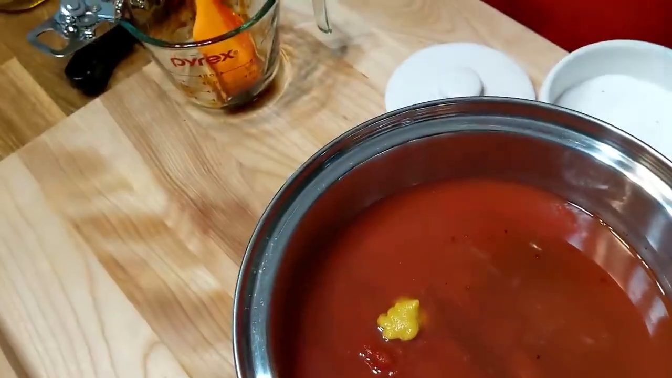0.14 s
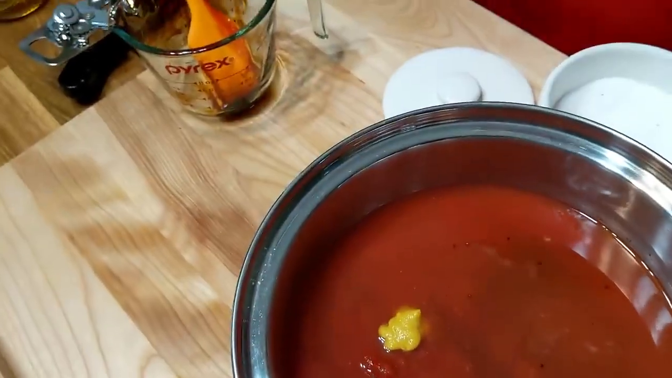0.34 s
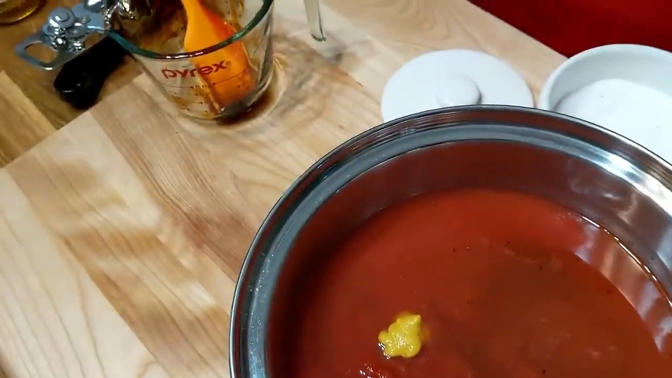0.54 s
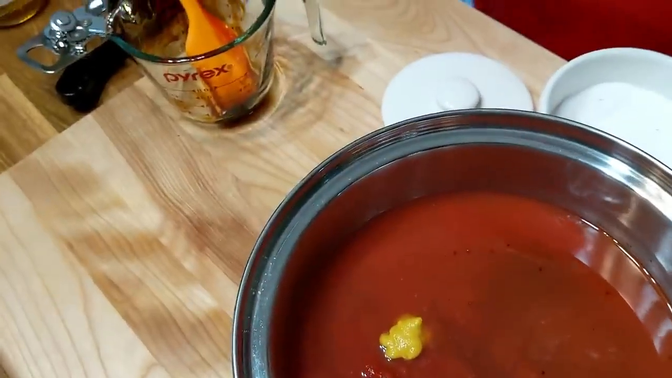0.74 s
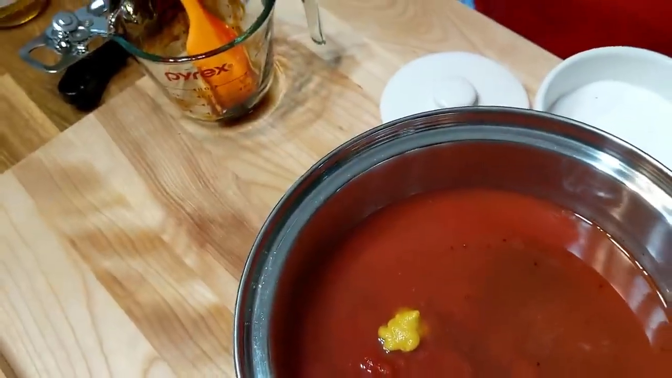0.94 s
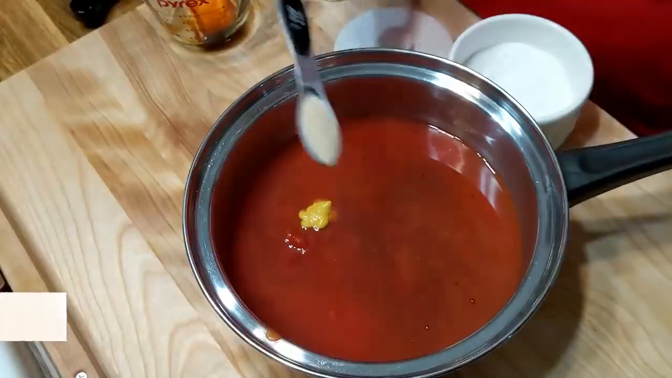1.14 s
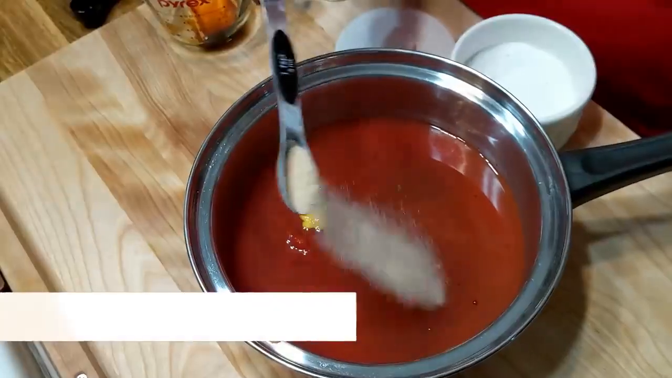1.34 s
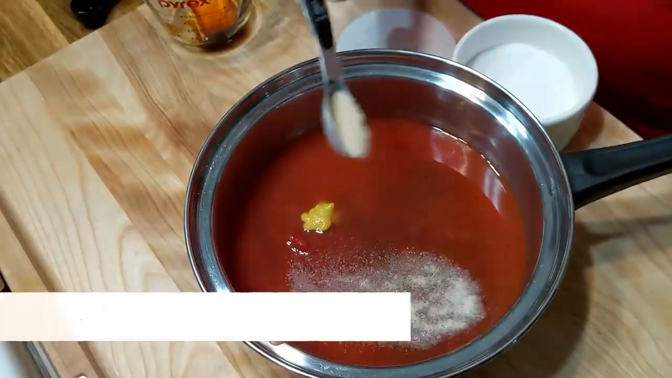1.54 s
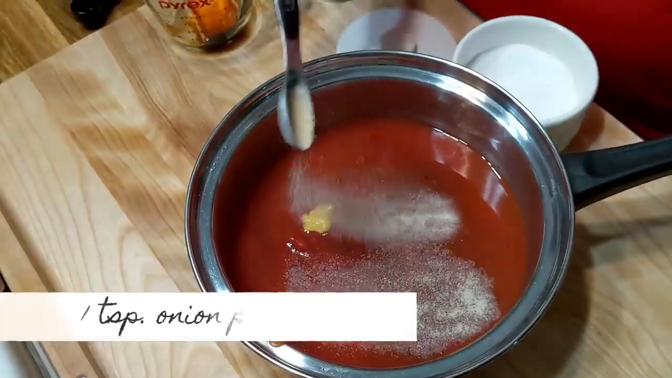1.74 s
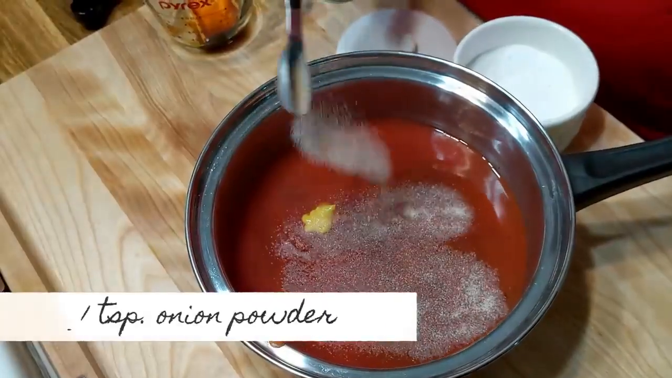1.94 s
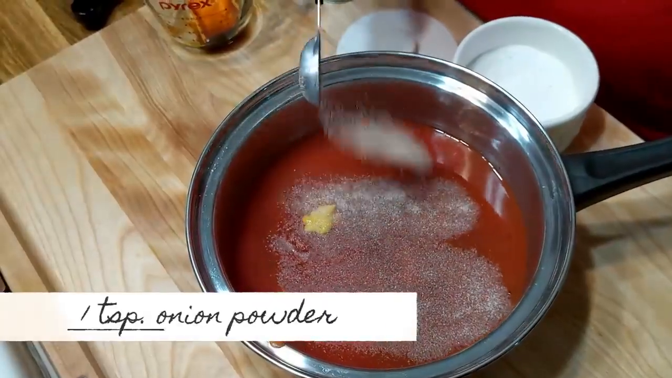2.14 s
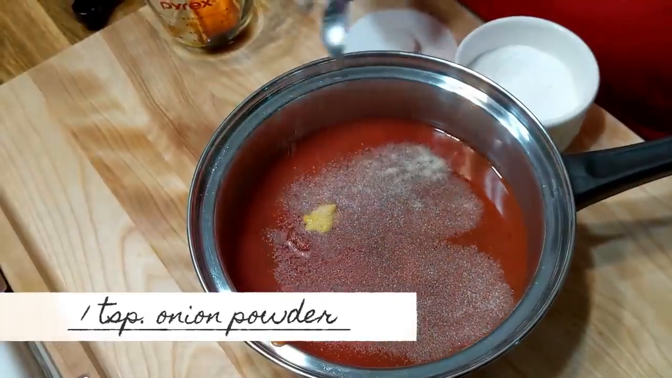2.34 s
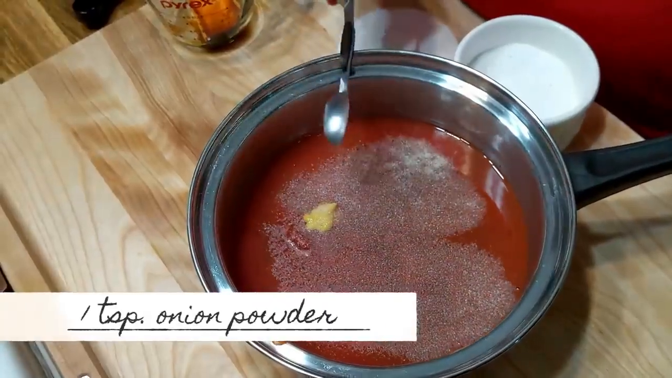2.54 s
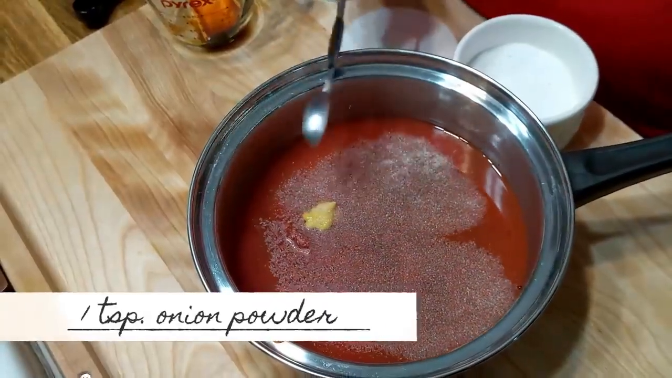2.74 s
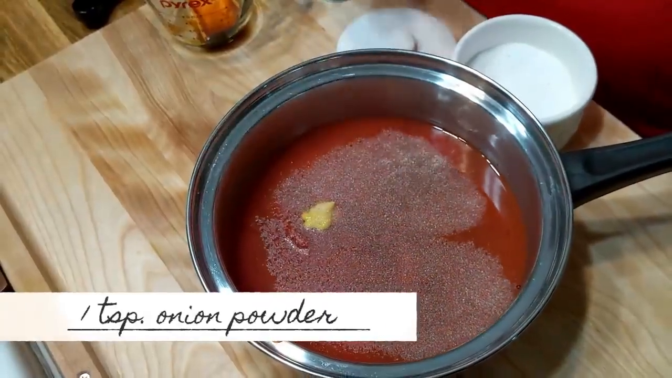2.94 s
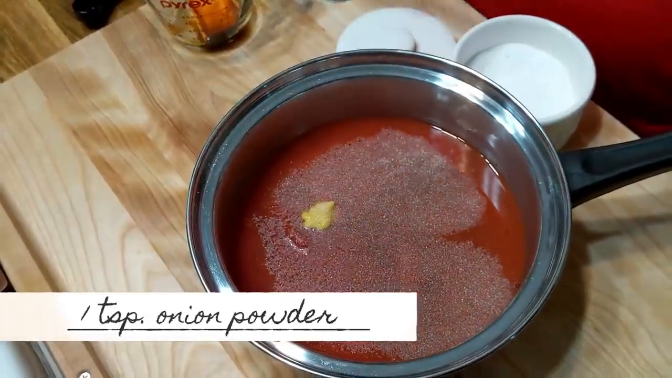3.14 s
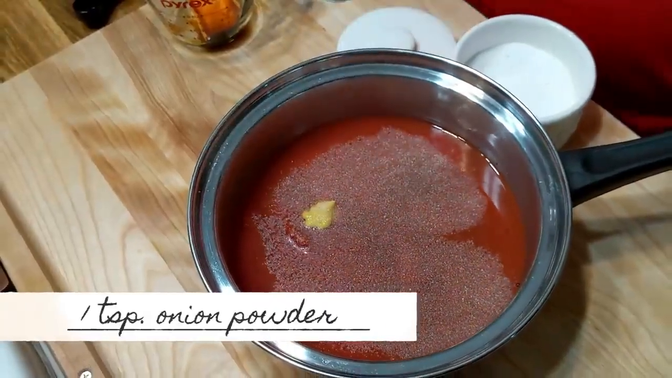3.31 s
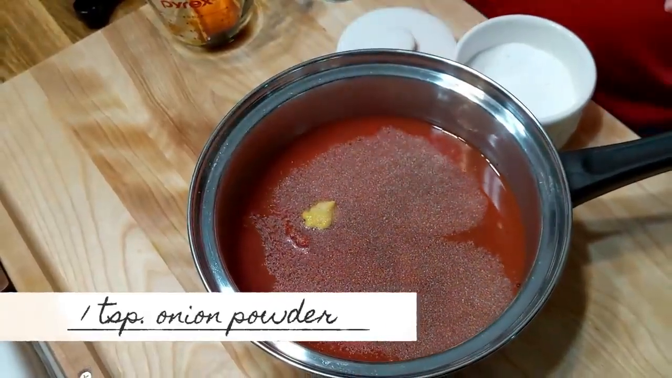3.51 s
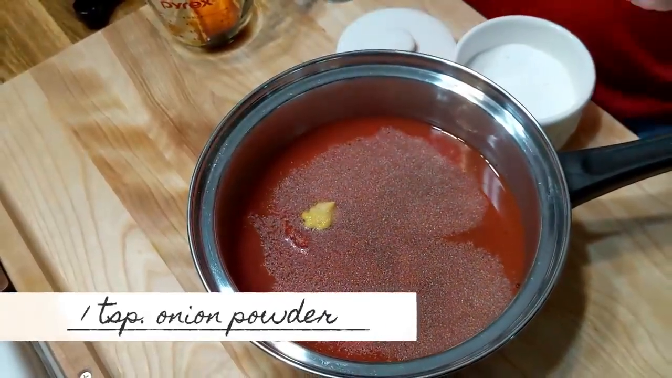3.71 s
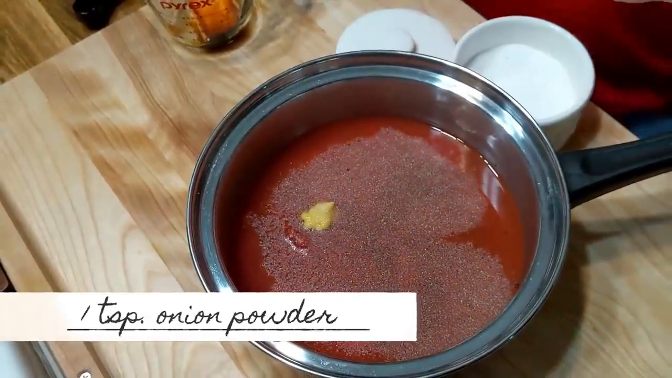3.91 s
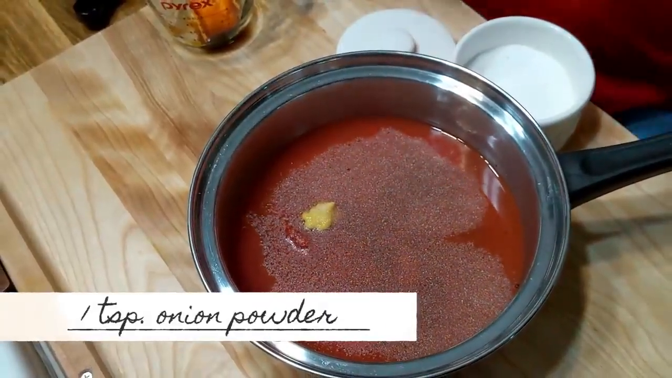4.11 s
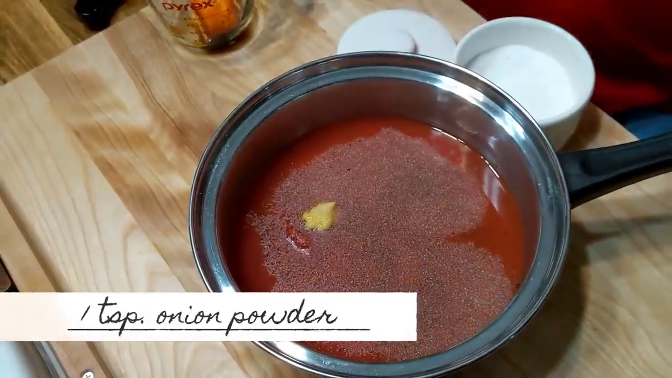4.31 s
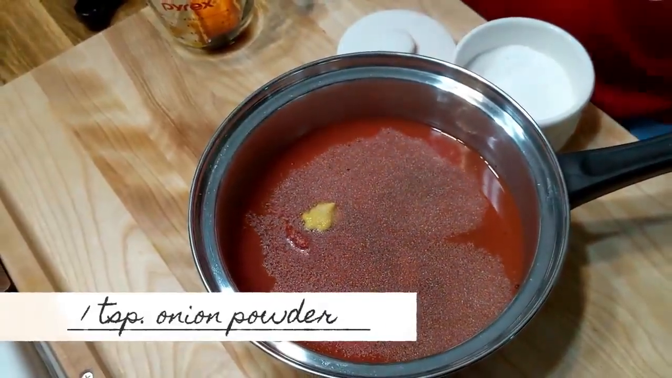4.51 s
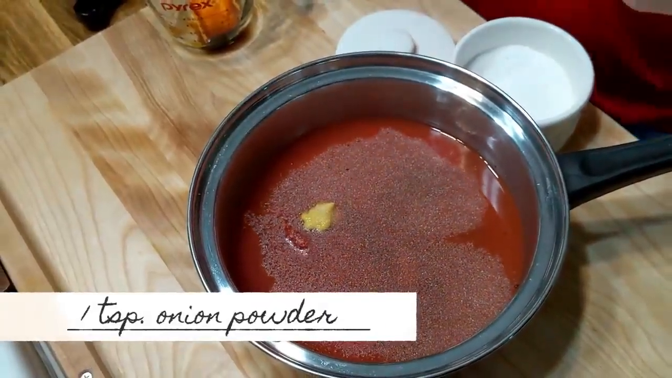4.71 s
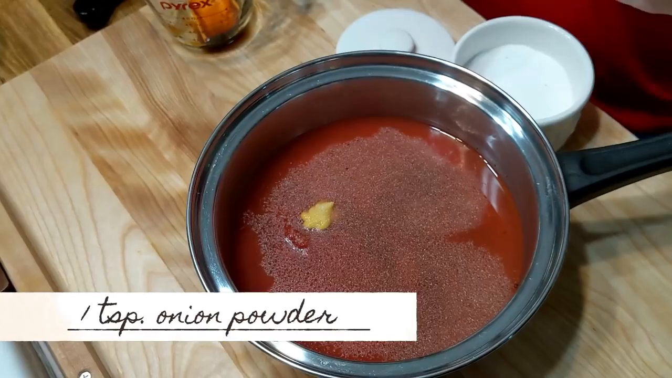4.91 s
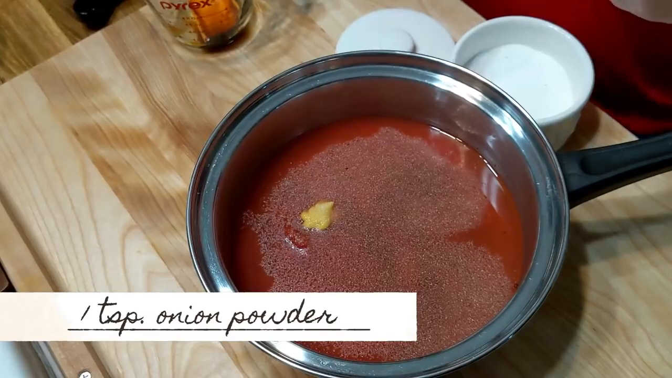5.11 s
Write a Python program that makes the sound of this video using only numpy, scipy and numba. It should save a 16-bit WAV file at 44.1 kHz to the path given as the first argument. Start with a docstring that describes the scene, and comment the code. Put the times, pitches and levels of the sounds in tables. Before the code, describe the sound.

A small kitchen heard through a close stereo camera microphone, with steady airy noise, a low wavering fridge hum and faint cloth and hand rustle, stronger on the right. A tiny tick falls near 0.4 s, then a soft thud and clearer knock on wood with a scuff around 0.65-0.7 s. Quiet rustling continues. At about 2.67 s and again at 2.88 s, a metal spoon strikes a steel saucepan rim: very loud, sharp, bright clanks with dense inharmonic ringing and clatter, overloading the microphone with a low bump, fading over roughly half a second in a short room echo. Near 4.0 s come two light knocks, mostly right. From 4.37 to 4.7 s a quick cluster of hard clicks and knocks, some loud, some with a glassy ring or woody thud, mixes with rustling. From 4.9 to 5.25 s something slides gritty across the board.

```python
"""A fridge hums under kitchen air, faint rustling runs throughout, and small things knock on a wooden board.
A metal measuring spoon then strikes a steel saucepan's rim twice, close under a stereo camera microphone.
More knocks follow, some with glass ringing, and something slides over the board.
Noise shaped in frequency makes air, friction and clatter; decaying sines make the ringing.
The blows overload the camera: its gain ducks and its baseline lurches."""
import sys
import numpy as np
from scipy import signal
from scipy.fft import rfft, irfft, next_fast_len
from scipy.io import wavfile
from scipy.ndimage import uniform_filter1d
from numba import njit

SR = 44100
rng = np.random.default_rng(int(sys.argv[2]) if len(sys.argv) > 2 else 0)


def master_out(mix):
    """Clip the mix to full scale and print it as 16-bit PCM to the path in sys.argv[1]."""
    frames = np.transpose(np.atleast_2d(mix))
    ceiling = np.clip(frames, -1, 1)
    pcm = np.round(ceiling * 32767).astype(np.int16)
    wavfile.write(sys.argv[1], SR, pcm)


N = 232089  # length in samples


def undb(db):
    """Gain of a dB value."""
    return 10 ** (np.asarray(db, float) / 20)


def on_log(table, hz):
    """Read a (Hz, value) table on a log-frequency axis."""
    table_hz, values = np.transpose(table)
    return np.interp(np.log(np.maximum(hz, 1)), np.log(table_hz), values)


def coloured(colour, size, channels=2):
    """Noise of rms 1 with the given spectrum."""
    n = next_fast_len(size)
    shape = undb(on_log(colour, np.fft.rfftfreq(n, 1 / SR)))
    white = rng.standard_normal((channels, n))
    noise = irfft(rfft(white) * shape, n)[:, :size]
    return noise / np.sqrt(np.mean(noise ** 2))


def fading(x, t60s):
    """Let each half-octave band of x die away at its own rate."""
    size = x.shape[1]
    t = np.arange(size) / SR
    spectrum = rfft(x)
    half_octave = np.log2(np.maximum(np.fft.rfftfreq(size, 1 / SR), 1)) * 2
    out = 0
    for k in range(10, 29):  # overlapping triangular bands
        band = irfft(spectrum * np.clip(1 - abs(half_octave - k), 0, 1), size)
        t60 = max(on_log(t60s, 2 ** (k / 2)), .01)
        out = out + band * undb(-60 * t / t60)
    return out


def ring(modes, size, scatter_db, turn):
    """Decaying modes; each microphone port hears each with its own strength and phase."""
    hz, db, t60 = np.transpose(modes)[:, :, None, None]
    strength, phase = rng.standard_normal((2, len(modes), 2, 1))
    t = np.arange(size) / SR
    # the ports differ less in phase below 2 kHz
    waves = np.sin(2 * np.pi * hz * t + turn * phase * np.minimum(hz / 2000, 1))
    level = undb(db + scatter_db * strength - 60 * t / np.maximum(t60, .002))
    return (level * waves).sum(axis=0)


def paired(modes, split):
    """A not quite round vessel splits each mode into two that beat."""
    pairs = []
    for hz, db, t60 in modes:
        for side in (0, rng.uniform(-0.89, 1)):
            pairs.append((hz * (1 + side * split), db - 5.5, t60))
    return pairs


def add(out, s, x, pan_db):
    """Mix x into out at time s, with the left louder than the right by pan_db."""
    i = int(s * SR)
    panned = x * undb([[pan_db / 2], [-pan_db / 2]])
    out[:, i:i + x.shape[1]] += panned[:, :N - i]


def walk(rate):
    """Random levels held 1 / rate s and slewed twice; spread near 1."""
    hold = int(SR / rate)
    steps = np.repeat(rng.standard_normal(N // hold + 1), hold)
    return 1.23 * uniform_filter1d(uniform_filter1d(steps, hold), hold)[:N]


def swells(table):
    """Sum of swells, each a rounded rise to its middle and an exponential fall."""
    s, db, rise, fall = np.transpose(table)[:, :, None]
    t = np.arange(N) / SR - s
    shape = np.exp(-np.where(t < 0, (t / rise) ** 2, t / fall))
    return (undb(db) * shape).sum(axis=0)


# Kitchen air common to both ports. Each row: frequency in Hz, relative density in dB per Hz.
AIR_MID = [(12, -7.5), (20, 6), (65, -9.5), (81, -13.5), (113, -0.5), (146, -11), (182, -11), (234, -11.5),
           (357, -15), (624, -19.5), (825, -20.5), (1860, -35), (3250, -31), (10800, -39.5), (16000, -32)]
# Kitchen air opposite in the two ports. Each row: frequency in Hz, relative density in dB per Hz.
AIR_SIDE = [(12, -37), (20, 1), (49, -9), (163, -10), (270, -2.5), (660, -3.5), (1030, -11), (1150, -14),
            (1330, -13), (1960, -18.5), (3250, -14), (10800, -20.5), (16000, -15)]
AIR_MID_DB, AIR_SIDE_DB = -43.5, -52
# Fridge tones. Each row: frequency in Hz, rms level in dB about which it wavers.
FRIDGE_HUM = [(60, -52.5), (108, -55), (119, -57), (178, -58.5), (355, -62.5), (673, -64.5), (1351, -70)]


def kitchen():
    """Nearly steady air noise, part common and part opposite at the ports, under wavering fridge tones."""
    mid = undb(AIR_MID_DB + 0.077 * walk(3.06)) * coloured(AIR_MID, N, channels=1)
    side = undb(AIR_SIDE_DB) * coloured(AIR_SIDE, N, channels=1)
    t = np.arange(N) / SR
    hum = 0
    for hz, db in FRIDGE_HUM:
        level = undb(db + 3 + 4.1 * walk(4.88))  # 3 dB from rms to sine peak
        hum = hum + level * np.sin(2 * np.pi * hz * t + 1.66 * walk(8))
    return mid + hum + side * np.array([[1], [-1]])


# Hands and cloth rustle. Each row: frequency in Hz, relative density in dB per Hz.
RUSTLE_COLOUR = [(500, -40), (1500, 6.5), (2600, 11), (4200, 8.5), (7000, -3), (16000, -3.5)]
RUSTLE_DB, RUSTLE_WAVER_DB = -59, -0.5  # faint all along
# Scuffs that stand out. Each row: middle in seconds, level in dB before flutter and panning,
# rise in seconds, fall in seconds.
SCUFFS = [(.2, -62, 0.086, 0.021), (.37, -51.5, 0.038, 0.032), (.71, -42.5, .004, 0.035),
          (.945, -56, 0.042, 0.057), (1.14, -58.5, 0.025, 0.034), (1.88, -75, 0.041, 0.072),
          (2.19, -57, 0.034, .02), (2.5, -64, 0.065, 0.035), (3.995, -49, 0.025, 0.02),
          (4.24, -67, .06, 0.022), (4.41, -36.5, 0.02, 0.039), (4.68, -39.5, 0.0086, 0.061)]
# Sliding over the board. Each row: frequency in Hz, relative density in dB per Hz.
SLIDE_COLOUR = [(300, -13), (680, -0.5), (900, 0.5), (1200, -25), (1460, -5), (1900, -18), (2800, -5),
                (3700, -11), (4100, -1), (4500, -9.5), (6000, -11), (8000, -16), (10000, -12), (16000, -12)]
# Course of the slide. Each row: time in seconds, level in dB before flutter and panning.
SLIDE = [(4.88, -62), (4.915, -42.5), (5.0, -41.5), (5.055, -34.5), (5.09, -38.5), (5.16, -37),
         (5.2, -46.5), (5.26, -61)]


def friction():
    """Sliding and rustling: hiss whose level flutters as surfaces grip and slip, stronger on the right."""
    right = np.array([[-1], [1]])
    sliding = undb(np.interp(np.arange(N) / SR, *np.transpose(SLIDE), left=-np.inf))
    slide = coloured(SLIDE_COLOUR, N) * sliding
    slide = slide * undb(1.5 * walk(60) + 1.7 * walk(300) + 2.6 * right)
    moving = undb(RUSTLE_DB + RUSTLE_WAVER_DB * walk(6.37)) + swells(SCUFFS)
    rustle = coloured(RUSTLE_COLOUR, N) * moving * undb(1.6 * walk(90) + 4.1 * right)
    return slide + rustle


# Things set down on the board. Each row: start in seconds, level in dB, pitch in Hz, tick t60 in seconds
# before choking, crack level in dB, crack tilt in dB per octave (four octaves of it give the 16 kHz point),
# glass ring in dB, thud in Hz, thud level in dB, thud t60 in seconds, left minus right in dB.
KNOCKS = [(0.369, -41.5, 3870, 0.022, 4, -6, -18, 240, -17, .1, -10),
          (.644, -43, 787, 0.16, -23, -7, -40, 378, 1.5, 0.29, -4),
          (.708, -19, 944, 0.054, -7.5, -4, -27, 199, -24, 0.15, -5),
          (3.963, -32, 2400, 0.017, -2, -13, -21, 156, -30, .1, -13),
          (3.993, -26, 883, 0.059, -4.5, 7, -13, 150, -32, 0.075, -10),
          (4.368, -2.5, 2680, 0.023, -27.5, -6.5, -28.5, 338, -38.5, 0.25, -15),
          (4.397, -30, 5150, 0.0073, 0, -7, -17, 340, -15, 0.11, 6),
          (4.403, -27, 2500, 0.013, -16, 2, -12, 340, -25, 0.14, -8),
          (4.417, -3.5, 5620, 0.011, -9.5, -2.5, -23, 330, -28, 0.11, -5),
          (4.436, -30, 2900, 0.011, 4, -4.5, -28, 356, -13, 0.045, 4),
          (4.542, -21, 9340, 0.012, 9.5, 0, -18, 305, -11, .05, -5.5),
          (4.574, -27, 853, 0.064, 8, -1.5, -13.5, 200.5, 0.5, 0.13, -2),
          (4.638, -37, 910, 0.038, -5, -1, -34, 312, 4.5, 0.034, -2),
          (4.679, -24, 860, 0.065, 9.5, -2.5, -20.5, 310, 3.5, 0.026, -3)]
# Glass modes. Each row: frequency in Hz, relative level in dB, t60 in seconds.
GLASS = [(1490, -8, 0.15), (2450, -8, 0.13), (2750, 0.5, 0.17), (4060, -3, 0.074), (5480, -25, 0.12),
         (5980, -29, 0.13), (7700, -19, 0.1)]


def knocks():
    """A pitched tick and a crack; glass rings on, the board thuds."""
    out, size = np.zeros((2, N)), SR // 2
    t = np.arange(size) / SR
    for s, db, hz, t60, crack_db, tilt_db, glass_db, thud_hz, thud_db, thud_t60, pan_db in KNOCKS:
        # the contact builds over a few cycles and rings three neighbouring modes, then chokes them
        neighbours = [(1.02 * hz, 0, t60), (0.915 * hz, -6, t60), (1.11 * hz, -13, t60)]
        build = 1 - np.exp(-(t * hz / 4.1) ** 2)
        choke = np.exp(-(t / (0.25 * t60)) ** 2)
        tick = ring(neighbours, size, 0, 0.32) * build * choke

        crack_colour = [(200, -19), (1200, -10.0), (16000, np.log2(16000 / 1000) * tilt_db)]
        crack = coloured(crack_colour, size) * undb(crack_db - 60 * t / 0.023)
        crack *= 1 - np.exp(-t / 0.0007)  # soft onset

        glass = undb(glass_db) * ring(paired(GLASS, 0.015), size, 1.2, 1.0)
        thud = undb(thud_db) * ring([(thud_hz, 0, thud_t60), (115, -8, .15)], size, 0.47, 0.62)
        add(out, s, undb(db) * (tick + crack + glass + thud), pan_db)
    return out


# Blows on the rim, close to the microphone. Each row: start in seconds, level in dB, left minus right in dB,
# clatter in dB, spoon ping in Hz, ping in dB, signed size of the baseline lurch before shaping and panning.
BLOWS = [(2.671, -2, -3.5, -4.5, 5400, -23.5, 0.51), (2.875, -3, -3.5, -5.5, 7820, -8.5, -0.72)]
# Clear modes of the saucepan. Each entry: frequency in Hz.
PAN_HZ = [722, 851, 862, 1050, 1206, 1293, 1451, 1575, 2150, 3130, 3531, 3589, 3630, 4030, 4052, 4145, 4501,
          4640, 4825, 4962, 5070, 5220, 5460, 5588, 5915, 6130, 6190, 6969, 7496, 7700]
# Ring of those modes. Each row: relative level in dB, t60 in seconds.
PAN_RING = [(-4, 0.43), (-13.5, 0.79), (-16, 0.26), (-17, 0.21), (-8, 0.25), (-5.5, 0.64), (3, 0.18),
            (-9, 0.25), (-17, 0.3), (-5, 0.37), (-2.5, 0.22), (-3, .4), (-18, 0.37), (-7, 0.71), (-6, 0.84),
            (-12, 0.73), (3, 0.2), (-25, 0.23), (-11, 0.21), (-9, 0.52), (1.5, 0.29), (4.5, 0.083),
            (-10, 0.33), (-11.5, 0.69), (6.5, 0.059), (1.5, 0.18), (-17, 0.73), (4, 0.15), (1.5, 0.2),
            (-6, 0.12)]
# Crowd of close wall modes heard as clatter. Each row: frequency in Hz, relative density in dB per Hz.
CLATTER = [(60, 2.5), (120, -2.5), (250, -7.5), (500, -17.5), (750, -7.5), (1450, -16), (1900, -10),
           (2750, -14.5), (3500, -9.5), (6000, -10), (7800, -7), (9000, -10), (10600, -14.5), (12500, -13),
           (14800, -8.5), (16000, -35)]
# Fading of the clatter. Each row: frequency in Hz, t60 in seconds.
CLATTER_T60 = [(100, 0.072), (700, 0.42), (2000, 0.6), (5000, 0.56), (9000, 0.38), (16000, 0.2)]


def saucepan():
    """Each blow rings the clear modes, a clatter of close ones around them, and briefly the spoon."""
    out = np.zeros((2, N))
    modes = np.column_stack([PAN_HZ, PAN_RING])
    f = np.fft.rfftfreq(SR, 1 / SR)
    # clatter gathers within about 45 Hz of the clear modes, over a floor raised in the bass and treble
    apart = (f - modes[:, :1]) / 45
    floor = 0.14 + (abs(f - 4200) > 3600) * 0.31
    crowd = np.sqrt(floor + (1 / (1 + apart ** 4)).sum(axis=0))
    for s, db, pan_db, clatter_db, ping_hz, ping_db, _ in BLOWS:
        noise = irfft(rfft(coloured(CLATTER, SR)) * crowd, SR)
        clatter = undb(clatter_db) * fading(noise, CLATTER_T60)
        spoon = ring([(ping_hz * k, ping_db, .06) for k in (.96, 1, 1.04)], SR, 1.4, 1.5)
        # crack of the contact
        spoon += rng.standard_normal((2, SR)) * undb(-0.5 - 60 * np.arange(SR) / SR / 0.018)
        clear = undb(-13.0) * ring(paired(modes, 0.00407), SR, 0.82, 1.56)
        add(out, s, undb(db) * (clear + clatter + spoon), pan_db)
    return out


# Fading of the kitchen's echo. Each row: frequency in Hz, t60 in seconds.
ROOM_T60 = [(100, 0.067), (1000, 0.52), (2700, 0.35), (5000, 0.43), (16000, 0.37)]
ROOM_DB = -3.5


def echo(source):
    """The room answers with a tail of coloured noise, each band fading at its own rate."""
    colour = [(500, 4.0), (1200, -1.5), (2500, 0.0), (7500, 3), (11000, -0.5)]
    tail = fading(coloured(colour, SR // 2), ROOM_T60)
    tail = tail / np.sqrt((tail ** 2).sum() / 2)
    tail = np.pad(tail, ((0, 0), (SR // 200, 0)))  # first walls after 5 ms
    room = signal.fftconvolve(source, tail, axes=1)[:, :N]
    return undb(ROOM_DB + np.array([[-1.5], [1.5]])) * room


def scene():
    """Hits echo in the room, over friction and kitchen noise."""
    pan, board = saucepan(), knocks()
    source = (board + undb(-10.0) * pan).mean(axis=0, keepdims=True)
    return pan + board + echo(source) + friction() + kitchen()


@njit
def follow(x, release):
    """Peak follower: instant rise, slow fall."""
    y, e = np.empty(len(x)), 0.
    for i in range(len(x)):
        e = max(x[i], e * release)
        y[i] = e
    return y


def lurch():
    """Overload shifts the preamp's working point; two coupling capacitors pull it back with an overshoot."""
    out, t = np.zeros((2, N)), np.arange(SR) / SR
    rise, settle = np.array([[.005], [.011]]), np.array([[.042], [.04]])  # s, left and right
    shape = (1 - np.exp(-(t / rise) ** 2)) * (1 - t / settle) * np.exp(-t / settle)
    for s, *_, size in BLOWS:
        add(out, s, size * shape, -4.0)
    return out


# Dips of the camera's microphone housing. Each row: centre in Hz, width in Hz, gain in dB.
HOUSING = [(2020, 250, -2.5), (6580, 150, -27), (8550, 710, -6), (10810, 2300, -6), (13630, 1600, -22)]
TOP_HZ = 15750  # upper edge of the passband


def record(dry):
    """The housing colours the sound; gain control ducks on loud peaks; the signal clips and the top is cut."""
    for hz, width, db in HOUSING:
        peak_band = signal.lfilter(*signal.iirpeak(hz, hz / width, SR), dry)
        dry = dry - (1 - undb(db)) * peak_band
    peak = follow(np.abs(dry).max(axis=0), undb(-8.0 / SR))  # falls 8 dB per second
    ducked = np.minimum(1, (undb(-0.5) / (peak + 1e-9)) ** 0.29)
    gain = uniform_filter1d(ducked, 64)
    wet = np.clip(dry * gain + lurch(), -1, 1)
    top_cut = signal.ellip(10, .2, 70, TOP_HZ, fs=SR, output="sos")
    return signal.sosfilt(top_cut, wet)


dry = scene()
out = record(dry)
master_out(out)
```